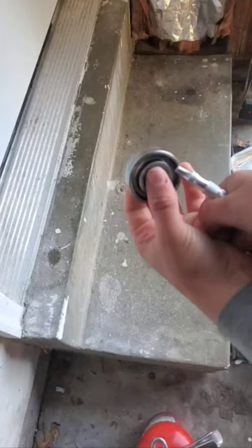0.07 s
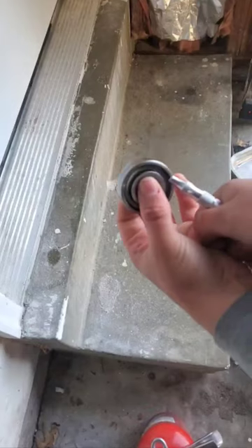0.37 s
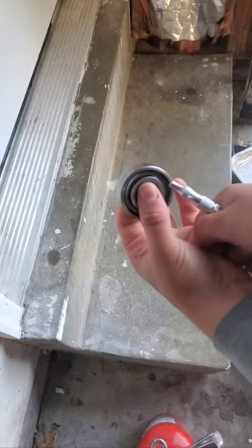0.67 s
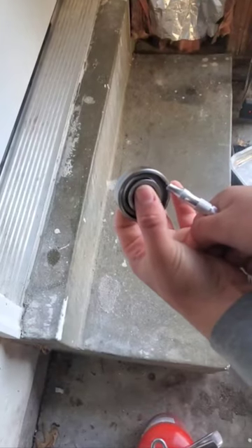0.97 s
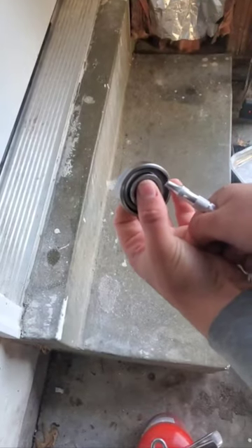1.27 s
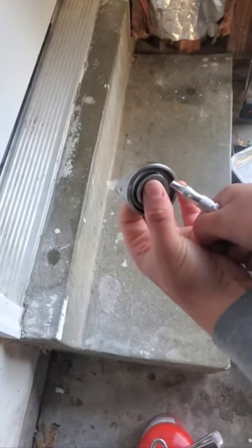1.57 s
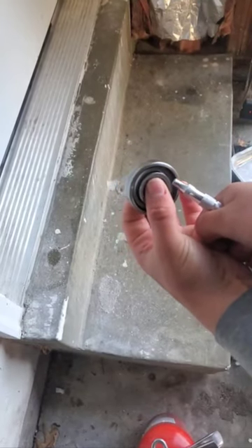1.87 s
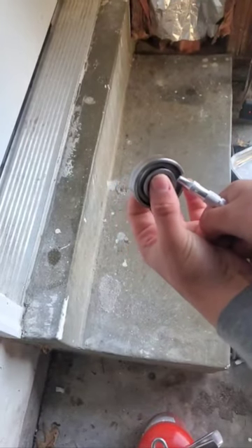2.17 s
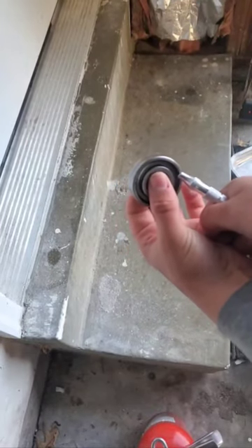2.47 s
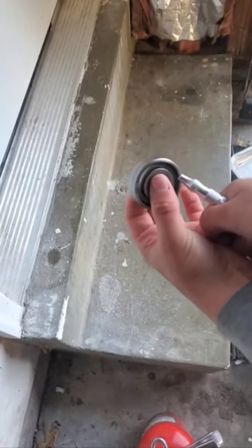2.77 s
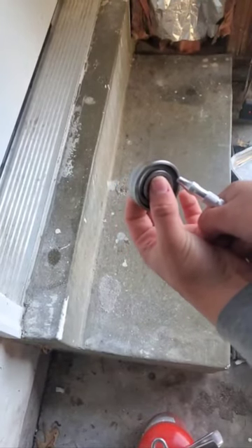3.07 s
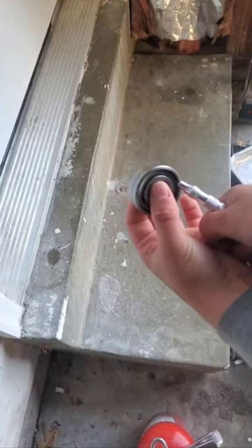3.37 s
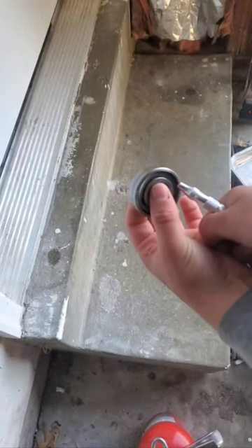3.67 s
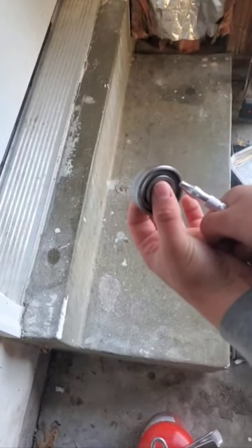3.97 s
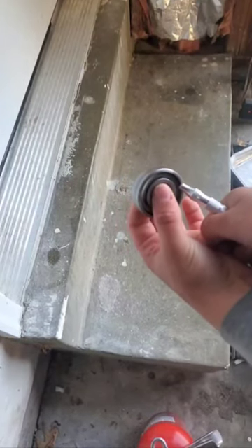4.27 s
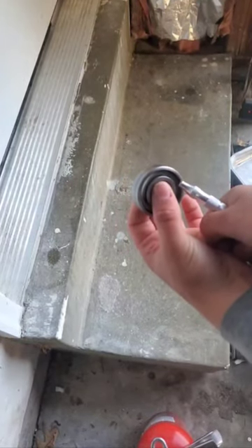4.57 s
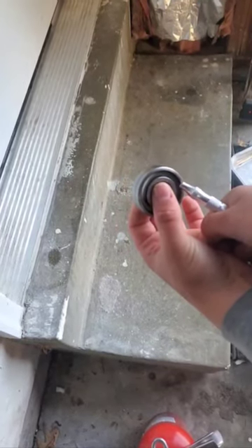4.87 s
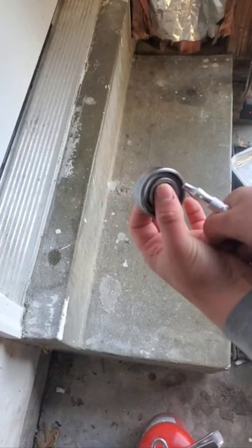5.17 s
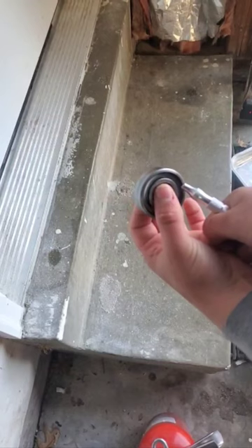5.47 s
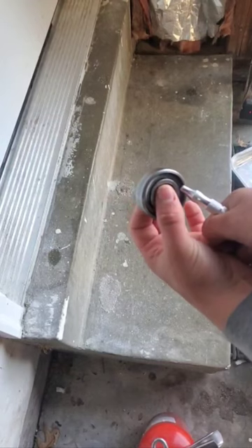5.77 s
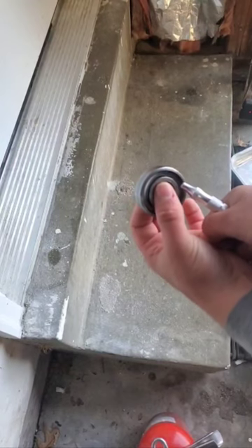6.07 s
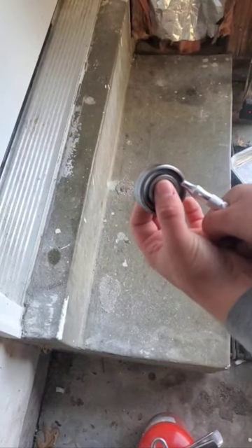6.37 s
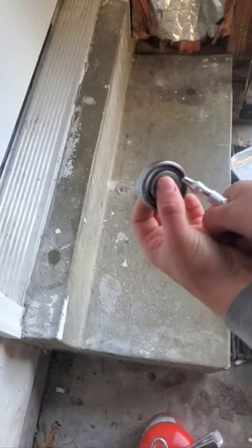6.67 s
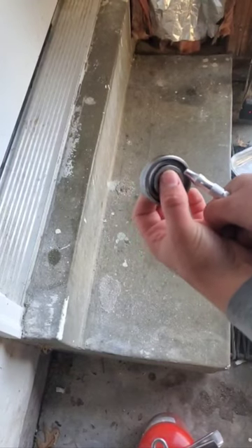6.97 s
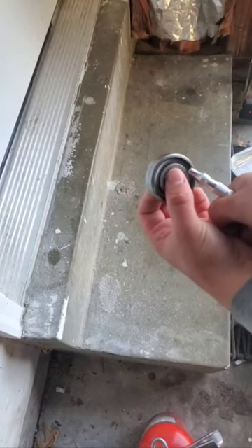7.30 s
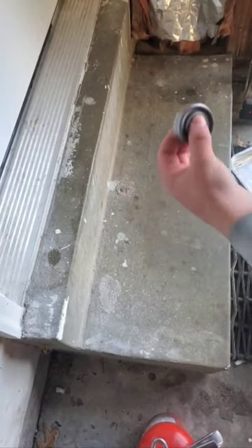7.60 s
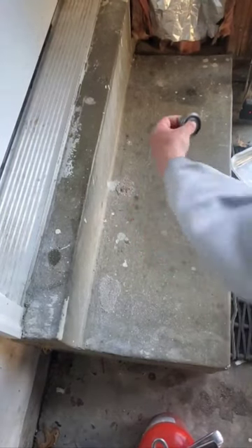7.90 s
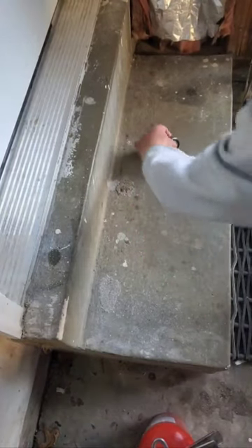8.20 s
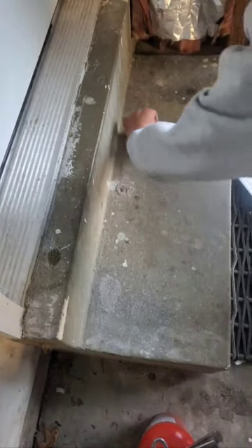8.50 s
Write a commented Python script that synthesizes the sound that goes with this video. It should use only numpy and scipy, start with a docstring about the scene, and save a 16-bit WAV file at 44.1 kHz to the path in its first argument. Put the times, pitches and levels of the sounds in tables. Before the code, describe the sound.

A close, shrill jet of air spins a hand-held bearing, its whine climbing in pitch under the hiss while the microphone sputters.

```python
"""Air gun spinning a ball bearing

A jet of air hisses on the rim of a hand-held bearing, close to a phone, and spins the ring up.
The passing balls chop the air into a rising whine, and the shrill jet overloads the right
microphone port, which sputters. Then the nozzle turns away: the whine is gone, the free jet
hisses on, softer, and a sleeve rumbles faintly in the quiet room."""
import sys
import numpy as np
from scipy import signal
from scipy.fft import rfft, irfft, next_fast_len
from scipy.io import wavfile
from scipy.ndimage import uniform_filter1d

SR = 44100
rng = np.random.default_rng(int(sys.argv[2]) if len(sys.argv) > 2 else 0)


def log_audio(samples):
    """Write samples as a 16-bit WAV file to the path given in sys.argv[1]."""
    # one column per channel
    frames = np.atleast_2d(samples).T
    # limit to full scale, then quantise
    limited = np.clip(frames, -1, 1)
    pcm = np.round(limited * 32767).astype(np.int16)
    wavfile.write(sys.argv[1], SR, pcm)


N = 381024
TIME = np.arange(N) / SR
WINDOW, HOP = 512, 128
FRAME_S = np.arange(N // HOP + 6) * HOP / SR
BIN_HZ = np.fft.rfftfreq(WINDOW, 1 / SR)
START_S, USUAL_OVERLOAD_DB = .125, -36
# how hard the jet overloads the right port: t/s, level/dB
OVERLOAD = [(0.15, -38.5), (0.35, -33), (0.5, -37.5), (1.4, -36), (2.35, -41), (2.6, -39.5), (3.0, -34),
            (3.25, -36), (3.4, -39), (4.1, -38.5), (4.25, -41.5), (4.85, -41), (5.3, -36.5), (5.55, -39.5),
            (5.76, -40), (6.1, -45.5), (6.45, -37.5), (6.85, -38), (7.2, -46), (7.48, -42)]


def amp(db):
    """Decibels to gain."""
    return 10 ** (np.asarray(db) / 20)


def unit_rms(x):
    """Scales to rms 1."""
    return x / np.sqrt(np.mean(x ** 2) + 1e-20)


def bell(x, centre, width):
    """Gaussian bump of height 1."""
    return np.exp(-((x - centre) / width) ** 2 / 2)


def curve(rows, t):
    """Each column of a time table at the times t."""
    times, *columns = np.transpose(rows)
    return [np.interp(t, times, c) for c in columns]


def colour(rows, hz):
    """Each column of a frequency table at hz, on a log axis."""
    freqs, *columns = np.transpose(rows)
    return [np.interp(np.log(hz + 1), np.log(freqs + 1), c) for c in columns]


def wander(rate_hz):
    """Smooth random motion of rms 1, rolling off above rate_hz."""
    size = next_fast_len(N)
    rolloff = bell(np.fft.rfftfreq(size, 1 / SR), 0, rate_hz)
    return unit_rms(irfft(rfft(rng.standard_normal(size)) * rolloff, size)[:N])


def flicker(rate_hz, steady_s=.16):
    """Quick random motion of rms 1, without drift slower than steady_s."""
    x = wander(rate_hz)
    return unit_rms(x - uniform_filter1d(x, round(steady_s * SR)))


def band(x, lo_hz, hi_hz):
    """Gentle band-pass."""
    return signal.sosfilt(signal.butter(2, [lo_hz, hi_hz], "band", fs=SR, output="sos"), x)


def noise_frames():
    """Short-time spectra (frames, bins) of white noise at 0 dB per Hz."""
    white = rng.standard_normal(len(FRAME_S) * HOP) * np.sqrt(SR / 2)
    return signal.stft(white, nperseg=WINDOW, noverlap=WINDOW - HOP)[2].T[:len(FRAME_S)]


def sound_of(frames):
    """Short-time spectra back to sound."""
    return signal.istft(frames.T, nperseg=WINDOW, noverlap=WINDOW - HOP)[1][:N]


def room(hum_hz=57.2, hum_db=-61):
    """Low room tone, partly shared by both ports, and a faint mains hum."""
    # noise floor: f/Hz, level/dB per Hz
    floor = [(20, -100), (60, -82), (150, -89.5), (300, -82.5), (600, -96), (2000, -99), (16000, -110)]
    gain = amp(colour(floor, BIN_HZ)[0])
    shared = noise_frames()
    air = np.array([sound_of(gain * (shared + noise_frames()) / np.sqrt(2)) for _ in range(2)])
    return air + amp(hum_db + wander(3)) * np.sqrt(2) * np.sin(2 * np.pi * hum_hz * TIME)


def nozzle(t, valve_s=.24, sag_db_per_s=.37, turn_s=7.59, turn_length_s=.13, turned_db=-6.2):
    """The valve opens, the jet holds, then turns away: aim (1 on the bearing), rush and sizzle in dB."""
    # brief swells and dips of the sizzle: t/s, half width/s, gain/dB
    swells = [(1.12, 0.2, 1.6), (1.62, 0.029, -2), (4.32, .015, -3), (5.1, 0.0082, -3.5), (7.25, 0.13, 1.7),
              (7.565, .035, 2.2)]
    aim = np.clip(1 - (t - turn_s) / turn_length_s, 0, 1)
    away_s = np.maximum(t - turn_s, 0)
    # the rush builds as the trigger is squeezed home and sags with the hose pressure
    throttled = np.clip(1 - (t - START_S) / valve_s, 0, 1)
    rush_db = -.95 - 3.5 * throttled - sag_db_per_s * t
    # it is fuller when the jet strikes hard enough to overload the port
    rush_db += .13 * (curve(OVERLOAD, t)[0] - USUAL_OVERLOAD_DB)
    sizzle_db = -.34 + sum(db * bell(t, s, width) for s, width, db in swells)
    # turned away, both drop and recede, the rush faster
    drop_db = (1 - aim) * turned_db
    return aim, aim * rush_db + drop_db - 5.5 * away_s, aim * sizzle_db + drop_db - 2.5 * away_s


def jet(flicker_db=1.65, rush_blotch_db=2.05, sizzle_blotch_db=1.06, free_port_share=.65):
    """Turbulent hiss: a low rush and a top sizzle, sharpened by the right port's resonances."""
    # base colour of the jet: f/Hz, level on the bearing/dB per Hz, level in free air/dB per Hz
    spectrum = [(100, -116, -93), (700, -86, -78.5), (1530, -74, -78), (2500, -68.5, -72.5),
                (3090, -65.5, -68.5), (3850, -62, -66), (4650, -69.5, -66.5), (5170, -63, -69),
                (6170, -65, -66), (7920, -74, -73), (8600, -70, -67.5), (11200, -67.5, -66),
                (13800, -68.5, -68.5), (15500, -69.5, -69)]
    # colour shifts as the hands move: t/s, half width/s, f/Hz, half width/Hz, gain/dB
    shifts = [(1.05, .3, 13400, 700, 1), (3.15, 0.17, 5200, 400, -2), (6.6, 0.19, 3900, 900, 2.5),
              (7.3, 0.35, 6900, 1000, 3.5), (7.85, 0.16, 3200, 1600, -1)]
    # resonances of the right port, which faces the nozzle: f/Hz, width/Hz, boost/dB
    resonances = [(9410, 1560, 13), (11770, 1740, 8.5), (13750, 1400, 5), (15130, 1440, 11)]
    # stereo image of the hiss: f/Hz, coherence/0-1, left lead/rad
    image = [(300, 0, 2), (1500, 0.1, 1), (3100, 0.26, 1.5), (4480, 0.35, 5), (5470, 0, 0), (6150, 1, 5),
             (6900, 0.53, 3), (9700, 0.47, 4.5), (10600, 0.98, 5), (11440, 0.2, 3.5), (12600, 0.3, 0),
             (14700, 0.5, 2)]
    t = FRAME_S[:, None]
    aim, rush_db, sizzle_db = nozzle(t)
    on_db, free_db = colour(spectrum, BIN_HZ)
    hiss_db = aim * on_db + (1 - aim) * free_db
    hiss_db += np.interp(t, TIME, flicker_db * np.minimum(flicker(16.6), .12))  # mostly dips
    hiss_db += sum(db * bell(t, s, span) * bell(BIN_HZ, hz, width) for s, span, hz, width, db in shifts)
    # random patches in time and frequency give the hiss the blotchy texture of compressed audio
    blotches = uniform_filter1d(rng.standard_normal(hiss_db.shape), size=30, axis=0)
    blotches = unit_rms(uniform_filter1d(blotches, size=9, axis=1))
    top = np.clip((BIN_HZ - 6000) / 2500, 0, 1)  # crossfade from rush to sizzle
    hiss_db += (1 - top) * (rush_db + rush_blotch_db * blotches)
    hiss_db += top * (sizzle_db + sizzle_blotch_db * blotches)
    port_db = sum(db * .5 ** ((2 * (BIN_HZ - hz) / width) ** 2) for hz, width, db in resonances)
    port_db = port_db * (aim + (1 - aim) * free_port_share)
    coherence, lead = colour(image, BIN_HZ)
    left = noise_frames()
    right = coherence * np.exp(-1j * lead) * left + np.sqrt(1 - coherence ** 2) * noise_frames()
    return np.array([sound_of(left * amp(hiss_db)), sound_of(right * amp(hiss_db + port_db))])


def on_rim(slide_s=7.49, length_s=.14):
    """Share of the jet that still strikes the rim as it slides off."""
    return np.clip(1 - (TIME - slide_s) / length_s, 0, 1)


def ball_rate(start_hz=318.8, push_hz_per_s=418.2, top_hz=2546.7, drag_power=4.326):
    """Balls passing per second: the jet pushes against drag that grows steeply with speed."""
    # the jet's grip on the ring slips or tightens: start/s, end/s, change/share of the push
    grip_changes = [(2.048, 2.428, -.396), (2.428, 2.912, .144), (5.845, 7.6, -.185)]
    grip = 1 + sum(change * ((FRAME_S > start) & (FRAME_S < end)) for start, end, change in grip_changes)
    hz = [start_hz]
    for push, step_s in zip(grip, np.diff(FRAME_S)):
        drag = (hz[-1] / top_hz) ** drag_power
        hz.append(hz[-1] + step_s * push_hz_per_s * (push - drag))
    return np.interp(TIME, FRAME_S, hz)


def overtone_db(k, rest_db=-56):
    """Level of the whine's partial k, which lies under the hiss and whistles out briefly."""
    # overtone flares: t/s, half width/s, partial number, peak/dB
    flares = [(2.45, .07, 3, -39), (2.7, .06, 3, -43), (3.83, .08, 3, -45), (4.48, .1, 3, -39.5),
              (4.75, .07, 3, -41.5), (5.75, .08, 3, -41.5), (6.07, .1, 3, -42.5), (7.3, .08, 3, -45),
              (7.5, .04, 3, -40), (2.63, .055, 4, -37), (3.5, .07, 4, -43), (4, .06, 4, -43.5),
              (4.68, .11, 4, -39), (5.63, .06, 4, -36), (5.82, .06, 4, -34.5), (6.03, .07, 4, -34),
              (7.05, .05, 4, -35), (5.75, .08, 5, -41), (6.22, .1, 5, -35), (7.38, .08, 5, -37)]
    peaks = sum(amp(db) * bell(TIME, s, width) for s, width, order, db in flares if order == k)
    return 20 * np.log10(np.maximum(peaks, amp(rest_db)))


def whine(jitter=.0009, ball_count=8, sideband_db=-18, flutter_db=1.6, flutter_step_db=1.8, fuzz_hz=70):
    """A siren: each passing ball cuts the jet; once a turn the cage adds a weaker tone below."""
    # the fundamental, set by how squarely the jet meets the balls: t/s, level/dB
    fundamental = [(0.15, -58), (0.3, -45), (0.43, -50), (0.68, -46), (0.8, -49), (0.92, -44), (1.02, -50),
                   (1.15, -43.5), (1.28, -44.5), (1.39, -53), (1.47, -42), (1.65, -41.5), (1.77, -46),
                   (1.88, -40.5), (2.05, -41), (2.27, -38), (2.48, -42), (2.55, -50), (2.64, -45),
                   (2.8, -57), (2.98, -43), (3.3, -53), (3.6, -46), (3.83, -46), (4.02, -35), (4.28, -37),
                   (4.48, -32.5), (4.72, -31.5), (4.85, -38), (5.14, -42), (5.28, -36), (5.48, -34),
                   (5.72, -37.5), (6.02, -29.3), (6.32, -30), (6.53, -53.5), (6.65, -38.5), (6.92, -41.5),
                   (7.04, -33.5), (7.26, -34.5), (7.36, -28.3), (7.47, -28), (7.52, -34)]
    # the octave above it: t/s, level/dB
    octave = [(0.15, -60), (1.2, -51), (1.47, -44.5), (1.6, -48), (1.7, -39), (1.8, -49), (1.88, -39),
              (1.94, -43), (2.03, -39), (2.13, -47), (2.32, -41.5), (2.46, -37), (2.6, -45), (2.74, -38.5),
              (2.86, -47), (3.02, -42), (3.19, -37), (3.28, -41), (3.38, -38), (3.53, -45), (3.64, -39),
              (3.75, -39.5), (3.87, -34.5), (3.95, -39), (4.1, -54), (4.2, -40), (4.37, -36), (4.53, -47),
              (4.62, -40), (4.73, -45), (4.84, -38.5), (5.02, -39.5), (5.3, -44), (5.56, -48),
              (5.72, -34.5), (5.82, -38), (5.92, -31.5), (6.3, -33.5), (6.6, -35.5), (6.82, -32.5),
              (6.98, -38.5), (7.15, -35.5), (7.27, -40), (7.39, -33.5), (7.5, -33)]
    # standing waves between the ports, which the whine sweeps through: f/Hz, left-right/dB, left lead/rad
    standing_waves = [(440, -6, -.3), (600, -12, -.4), (750, -7, .8), (950, -1, .6), (1300, -2, .7),
                      (1500, -7, 2), (1660, -2, 1.1), (1790, -3, 1.3), (1885, 2, .6), (1940, -9, .3),
                      (1985, 6, 1.9), (2060, 8, 1.9), (2115, 1, 1.3), (2160, 7, 2.2), (2245, 8, 2.2),
                      (2290, 0, .3), (2335, -2, 0), (2370, -6, -.1), (2420, 2, 2.7), (2490, 1, 2.5),
                      (2540, 1, 1.5), (2650, 1, 2.3), (2780, 0, 1.2), (3200, 4, 1.6), (3520, -2, 1.1),
                      (3640, -4, 2.3), (3880, 2, 1.6), (4080, 3, 1.4), (4150, 0, 2.2), (4250, 2, 1.3),
                      (4530, 0, 2.9), (4580, 6, 2.4), (4630, 6, 2.4), (4690, 3, 3.3), (4745, 5, 4.3),
                      (5400, 0, 1.6), (7000, -5, 2.6), (8200, 0, 2.4), (9000, -8, 4), (9500, -8, 4),
                      (11500, 0, 3.4)]
    hz = ball_rate()
    cycles = np.cumsum(hz * (1 + jitter * wander(20))) / SR
    main_db = curve(fundamental, TIME)[0]
    partials = [(1, main_db), (1 - 1 / ball_count, main_db + sideband_db), (2, curve(octave, TIME)[0])]
    partials += [(k, overtone_db(k)) for k in (3, 4, 5)]
    out = np.zeros((2, N))
    for k, db in partials:
        pan_db, lead = colour(standing_waves, k * hz)
        # turbulence shakes the higher partials more, so they melt into the hiss
        shake_db = (flutter_db + flutter_step_db * (k - 1)) * np.minimum(flicker(23), 1.1)
        fuzz_rad = .14 * (k - .5)
        right_gain = 2 * amp(db + shake_db) / np.sqrt(1 + amp(pan_db) ** 2)
        phase = 2 * np.pi * k * cycles
        out[0] += right_gain * amp(pan_db) * np.cos(phase + lead + fuzz_rad * wander(fuzz_hz))
        out[1] += right_gain * np.cos(phase + fuzz_rad * wander(fuzz_hz))
    return out * on_rim() ** 2


def sputter(level_db=2, peakiness=2.52, swing_hz=1750, clump_db=1.5, pop_width_s=.00006, leak_db=-36):
    """The right port rectifies the jet's ultrasound: each peak of its envelope is a one-sided spike."""
    # the loudest pops: t/s, peak before filtering/dB
    pops = [(0.541, -11), (0.8849, -7), (1.078, -8.5), (1.2438, -9), (1.312, -11), (1.6954, -8),
            (2.15, -7.5), (2.2706, -10.5), (2.534, -7), (2.757, -10), (2.8183, -9), (3.1151, -11),
            (3.1684, -9.5), (3.2544, -8.5), (3.2595, -6.5), (3.3959, -11), (3.4688, -10.5), (3.5955, -11),
            (3.6367, -11), (3.7611, -10.5), (3.9353, -12), (4.083, -12), (4.089, -8.5), (4.1067, -9),
            (4.1197, -11), (4.4114, -12.5), (4.432, -12), (4.5388, -12), (4.6205, -11), (4.7226, -10.5),
            (4.7271, -12.5), (4.8298, -13), (5.0893, -8), (5.148, -9), (5.201, -11), (5.2697, -11),
            (5.331, -11), (5.4014, -11), (5.4532, -11.5), (5.4811, -11), (5.5638, -11), (5.7, -11),
            (5.7193, -7.5), (5.746, -6.5), (5.7702, -10), (5.7925, -7.5), (5.9048, -8.5), (5.9263, -13),
            (6.0002, -16), (6.141, -15), (6.2198, -12), (6.238, -12.5), (6.5091, -12), (6.5678, -13),
            (6.621, -13), (6.6291, -8.5), (6.6887, -10), (6.7376, -14), (6.825, -11), (6.8368, -13),
            (6.8564, -12), (6.9033, -14), (6.9873, -12), (7.0388, -14), (7.0926, -16), (7.3763, -13.5),
            (7.433, -9), (7.4527, -11), (7.4643, -16), (7.4868, -16.5), (7.4907, -14)]
    overload_db = curve(OVERLOAD, TIME)[0]
    envelope = np.minimum(np.hypot(wander(swing_hz), wander(swing_hz)), 4.1)
    spikes = envelope ** peakiness
    spikes = spikes.mean() - spikes
    clumps = np.minimum(wander(20), 1.1)
    spikes *= amp(level_db + overload_db + clump_db * clumps) / np.std(band(spikes, 67, 890))
    spikes *= np.sqrt(on_rim())
    for s, db in pops:
        near = slice(round(s * SR) - 40, round(s * SR) + 40)
        spikes[near] -= amp(db) * bell(TIME[near], s, pop_width_s)
    # the input's low cut rings a little, which gives each spike a soft thud, heavier in deep overload
    thud_db = -4 + .61 * (overload_db - USUAL_OVERLOAD_DB)
    thud = amp(thud_db) * band(spikes, 63, 105)
    return band(spikes + thud, 59, 11700) * amp([[leak_db], [0]])


def sleeve(peak_s=8.45, level_db=-55, fade_db_per_s=54, lumpy_db=2):
    """Moving cloth: a soft, lumpy rumble that swells and fades."""
    rumble = unit_rms(band(rng.standard_normal(N), 80, 190))
    return rumble * amp(level_db - fade_db_per_s * abs(TIME - peak_s) + lumpy_db * wander(22))


def scene():
    """All layers at the left and right ports."""
    return jet() + whine() + sputter() + sleeve() + room()


def record(dry, fade_s=.003, edge_hz=15560):
    """The sound cuts in with the air already on; a steep low-pass trims the top."""
    opened = dry * np.clip((TIME - START_S) / fade_s, amp(-62), 1)
    low_pass = signal.firwin(1023, edge_hz, window=("kaiser", 8), fs=SR)
    return signal.oaconvolve(opened, low_pass[None], "same")


dry = scene()
out = record(dry)
log_audio(out)
```